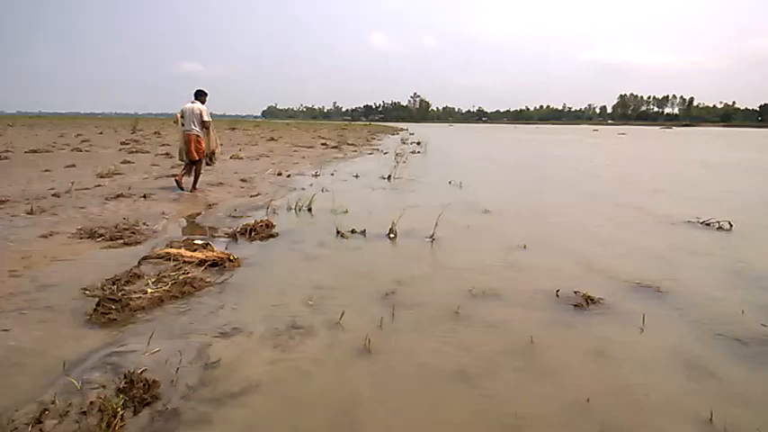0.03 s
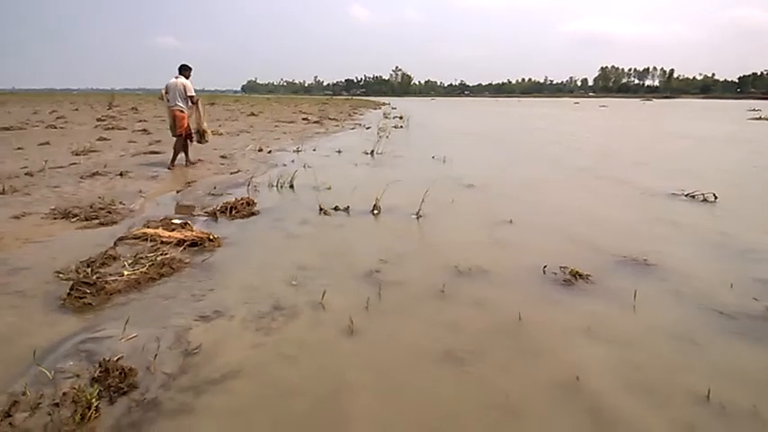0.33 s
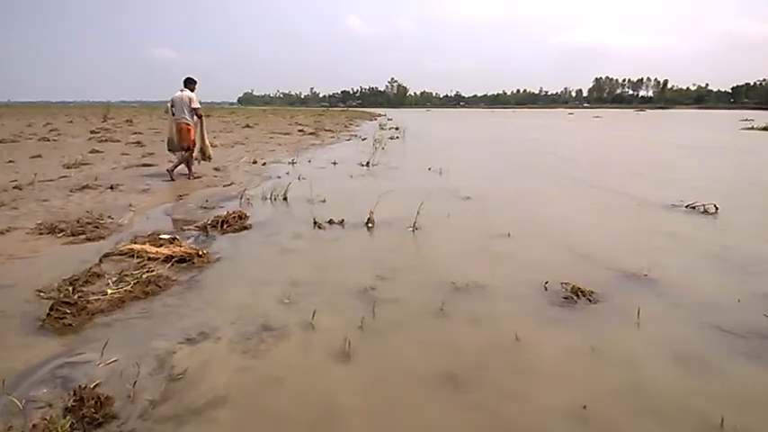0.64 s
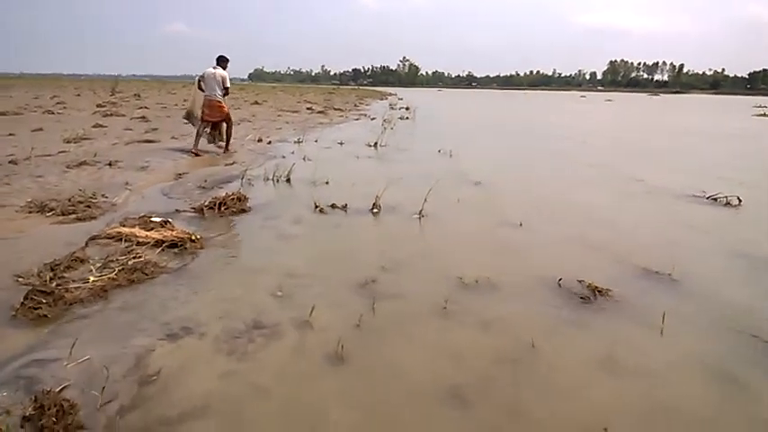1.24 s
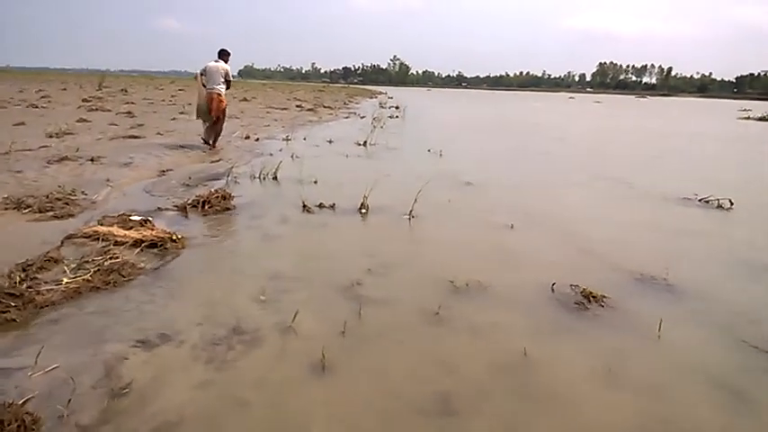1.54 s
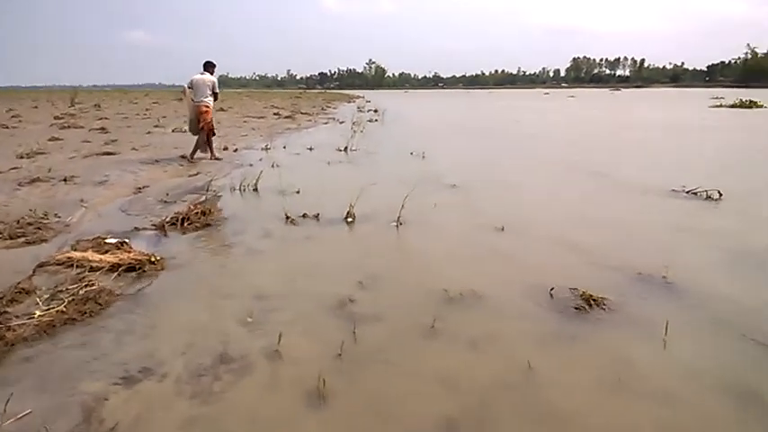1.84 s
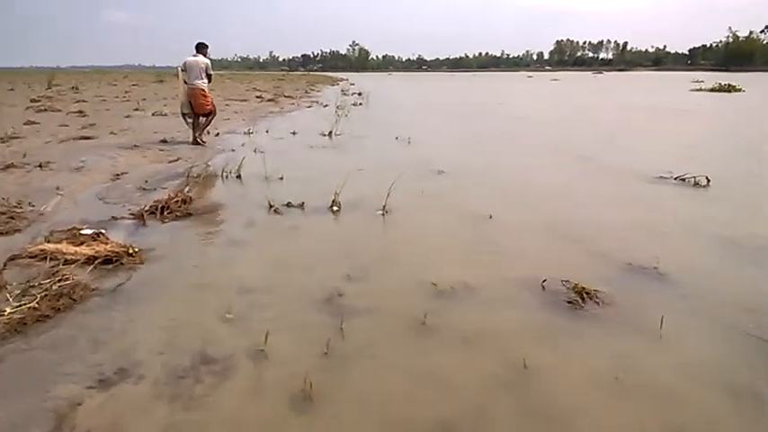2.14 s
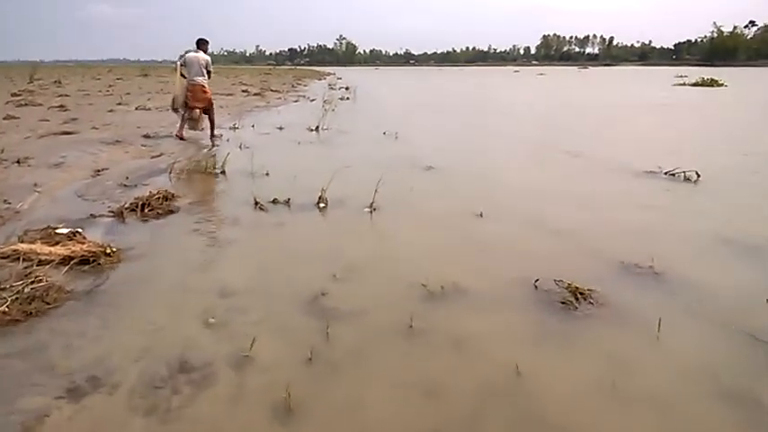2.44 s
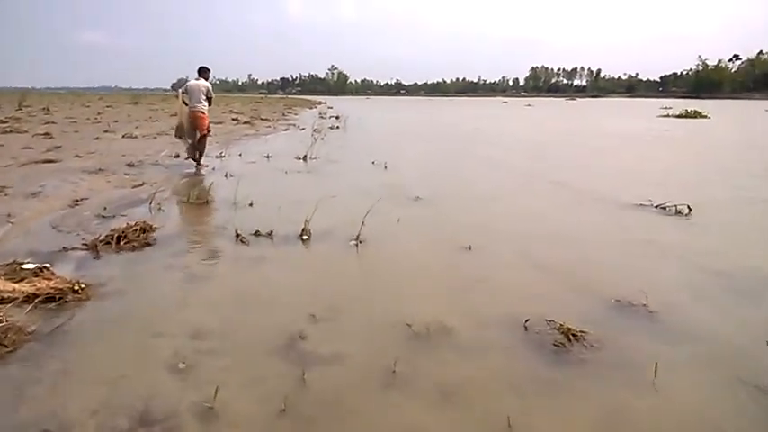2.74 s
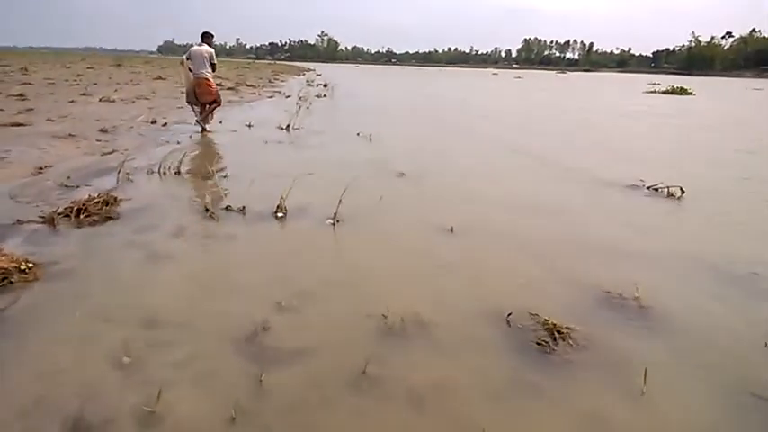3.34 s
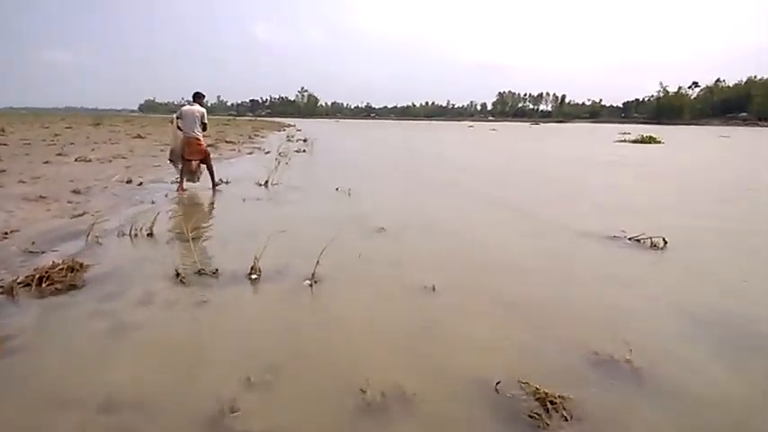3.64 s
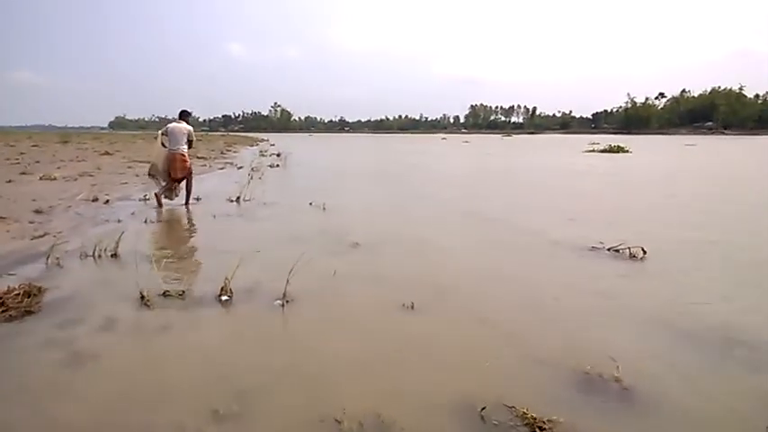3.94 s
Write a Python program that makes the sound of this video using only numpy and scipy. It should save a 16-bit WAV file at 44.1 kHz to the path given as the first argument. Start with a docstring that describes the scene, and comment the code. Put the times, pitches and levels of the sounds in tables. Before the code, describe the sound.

Soft wading footsteps slosh through shallow water and mud some metres away, about one a second, each gurgling and then dripping. Low wind buffets the microphone, strongest near the end, when a distant bird peeps faintly.

```python
"""Wading along a muddy river edge

A man wades some metres away, about one step a second. Each foot plunges in and drags air under,
which gurgles as resonating bubbles; the other pulls out with a snap of mud, throwing spray that
drips back. Wind eddies buffet the microphone, a far bird peeps, and a steady hiss lies under it all."""
import sys
import numpy as np
from scipy import signal
from scipy.fft import rfft, irfft
from scipy.io import wavfile
from scipy.ndimage import uniform_filter1d

SR = 44100
rng = np.random.default_rng(int(sys.argv[2]) if len(sys.argv) > 2 else 0)


def materialize(psi):
    """Save the field psi as 16-bit PCM at rate SR to the path in sys.argv[1].

    A 1-D psi becomes a single channel; in a 2-D psi each row is a channel.
    """
    bounded = np.clip(np.atleast_2d(psi).T, -1, 1)
    quanta = np.round(bounded * 32767).astype(np.int16)
    wavfile.write(sys.argv[1], SR, quanta)


N = 176400
TIME = np.arange(N) / SR


def from_db(db):
    """Amplitude ratio of a level in decibels."""
    return 10 ** (np.asarray(db) / 20)


def unit_rms(x):
    """Normalisation to unit mean power."""
    return x / np.sqrt(np.mean(x ** 2) + 1e-20)


def coloured(x, spectrum):
    """Spectral shaping by (f/Hz, level/dB) points, falling 12 dB an octave outside them; rms 1."""
    hz, db = np.transpose(spectrum)
    f = np.maximum(np.arange(N // 2 + 1) * SR / N, 1)
    skirts = np.minimum(f / hz[0], 1) ** 2 * np.minimum(hz[-1] / f, 1) ** 2
    gain = from_db(np.interp(np.log(f), np.log(hz), db))
    return unit_rms(irfft(rfft(x) * skirts * gain, N))


def noise(spectrum):
    """Filtered Gaussian noise of unit rms."""
    return coloured(rng.standard_normal(N), spectrum)


def evened(x, span_s):
    """Division by the running rms removes level swings slower than span_s."""
    size = max(int(span_s * SR), 2)
    power = uniform_filter1d(uniform_filter1d(x * x, size), size)
    return x / np.sqrt(np.abs(power) + 1e-9)


def add(out, start_s, sound):
    """Superposition of a sound from start_s on."""
    i = int(np.clip(start_s * SR, 0, N - 1))
    out[i:i + len(sound)] += sound[:N - i]


def swell(peak_s, rise_s, hold_s, decay_db_per_s):
    """Envelope with a Gaussian rise, a plateau and an exponential decay."""
    rise = np.exp(-2 * (np.minimum(TIME - peak_s, 0) / rise_s) ** 2)
    return rise * from_db(-decay_db_per_s * np.maximum(TIME - peak_s - hold_s, 0))


def bubble_cloud(spectrum, per_s, cycles, spread_db=6, pitches=28):
    """Bubbles as damped resonators, struck at random; each falls 60 dB in the given cycles."""
    born = rng.random(N) < per_s / SR
    strength = from_db(spread_db * np.minimum(rng.exponential(1, N), 4))
    impulses = born * strength * rng.choice([-1, 1], N)
    pitch_index = rng.integers(0, pitches, N)
    out = np.zeros(N)
    for k, hz in enumerate(np.geomspace(spectrum[0][0], spectrum[-1][0], pitches)):
        radius = np.exp(-np.log(1000) * hz / (cycles * SR))
        omega = 2 * np.pi * hz / SR
        feedback = [1, -2 * radius * np.cos(omega), radius * radius]
        drive = impulses * (pitch_index == k) + 1e-18
        out += omega * signal.lfilter([0, np.sin(omega)], feedback, drive)
    return coloured(out, spectrum)


# Spectrum of the hiss: f/Hz, level/dB
HISS_SPECTRUM = [(500, -4.5), (1400, -11.5), (2900, -14), (3950, -5.5), (5200, -16), (7500, -7.5),
                 (11000, -9.5), (15500, -14.5)]


def hiss(level_db=-59):
    """Stationary broadband noise forms a steady floor."""
    return from_db(level_db) * noise(HISS_SPECTRUM)


# Strength of the breeze: t/s, level/dB
BREEZE_LEVELS = [(.55, -53.5), (.8, -46), (.96, -60.5), (1.8, -40.5), (2.17, -55), (2.55, -45),
                 (2.87, -50.5), (3.4, -48), (4.0, -55.5)]
# Spectrum of the breeze: f/Hz, level/dB
BREEZE_SPECTRUM = [(20, 2), (95, 2), (150, -6), (350, -20.5), (550, -41.5)]
# Buffets: peak t/s, Gaussian half-width/s, peak rms level/dB, eddy f/Hz
WIND_BUFFETS = [(0.646, 0.002, -34.5, 177), (0.685, 0.051, -39, 85.6), (0.786, 0.012, -28.5, 103),
                (0.846, 0.025, -37.5, 97), (1.083, 0.068, -37.5, 112), (1.26, 0.0099, -24, 104),
                (1.289, 0.0089, -27, 118), (1.458, 0.002, -22.5, 208), (1.468, 0.029, -31, 85),
                (1.611, 0.0053, -19, 140), (1.666, 0.061, -30.5, 76.4), (1.769, 0.0098, -26.5, 114),
                (1.84, 0.081, -38, 86), (2.034, 0.047, -33, 75.6), (2.243, 0.0063, -29.5, 215),
                (2.263, 0.0071, -28, 58.5), (2.338, 0.016, -33.5, 59.7), (2.789, 0.0073, -16.5, 160),
                (2.94, 0.0088, -33.5, 84.5), (3.136, 0.017, -35.5, 138), (3.187, 0.0091, -22, 87),
                (3.247, 0.013, -19.5, 95), (3.317, 0.021, -29.5, 73.5), (3.479, 0.0081, -25.5, 108),
                (3.542, 0.018, -20, 126), (3.599, 0.012, -14.5, 216), (3.646, 0.032, -14.5, 117),
                (3.648, 0.029, -22, 196)]
# Spectrum of a buffet: multiple of the eddy frequency, level/dB
BUFFET_SPECTRUM = [(.2, -8), (1, 0.5), (1.6, -8), (2.5, -19), (4, -35), (8, -53)]


def wind(even_cycles=2.26):
    """Turbulent pressure at the microphone: a low breeze, and buffets that are higher for small eddies."""
    out = from_db(np.interp(TIME, *np.transpose(BREEZE_LEVELS))) * noise(BREEZE_SPECTRUM)
    for peak_s, width_s, db, hz in WIND_BUFFETS:
        spectrum = [(multiple * hz, band_db) for multiple, band_db in BUFFET_SPECTRUM]
        eddies = evened(noise(spectrum), span_s=even_cycles / hz)
        envelope = np.exp(-np.minimum(((TIME - peak_s) / width_s) ** 2, 100) / 2)
        out += from_db(db) * envelope * eddies
    return out


# A foot enters the water: peak t/s, level/dB, decay/(dB/s), rise/s
FOOT_PLUNGES = [(0.234, -51.5, 159, 0.032), (1.101, -42.5, 86, 0.04), (2.028, -45.5, 102, 0.037),
                (2.295, -42.5, 66, 0.018), (3.023, -43.5, 93, 0.018), (3.951, -49, 91, 0.066)]
# Spectrum of the gurgle: f/Hz, level/dB
PLUNGE_SPECTRUM = [(450, -9), (650, -3), (900, 1), (1150, 1), (1500, -5.5), (2200, -13.5), (4500, -25)]


def plunges():
    """Air entrainment: each foot drags under bubbles that ring low over a soft wash."""
    envelope = sum(from_db(db) * swell(peak_s, rise_s, 0, decay)
                   for peak_s, db, decay, rise_s in FOOT_PLUNGES)
    bubbles = bubble_cloud(PLUNGE_SPECTRUM, per_s=750, cycles=30)
    wash = 0.4 * noise(PLUNGE_SPECTRUM)
    return envelope * evened(bubbles + wash, span_s=0.033)


# Mud and water films snap: peak t/s, peak rms level/dB
MUD_SNAPS = [(.307, -45), (0.591, -54), (2.782, -48.5), (3.289, -60), (3.385, -53)]
# Spectrum of a snap: f/Hz, level/dB
SNAP_SPECTRUM = [(4200, 1), (12000, -5)]


def snaps():
    """Rupture of wet mud and water films: brief transients, bright and without pitch."""
    envelope = sum(from_db(db) * swell(peak_s, rise_s=0.0054, hold_s=0, decay_db_per_s=1202)
                   for peak_s, db in MUD_SNAPS)
    return envelope * noise(SNAP_SPECTRUM)


# Single plops and drips: t/s, relative level/dB, starting f/Hz, cycles to fall 60 dB
SINGLE_BUBBLES = [(0.366, -58, 785, 104), (.446, -38.5, 2370, 12), (.571, -37, 3960, 32),
                  (.673, -43.5, 2500, 46), (.683, -32.5, 3570, 16.5), (0.737, -42, 847, 19.6),
                  (.749, -36, 4040, 15), (.796, -40.5, 4800, 19), (1.087, -26, 854, 16),
                  (1.121, -24.5, 860, 13.4), (1.201, -34, 3600, 12), (1.359, -20, 3400, 7.2),
                  (1.384, -41.5, 1080, 40), (1.629, -23.5, 2160, 10.7), (1.672, -19.5, 3420, 6.4),
                  (1.673, -29.5, 1690, 9.7), (1.77, -37, 5000, 12), (2.022, -23, 985, 14),
                  (2.072, -32, 1026, 29), (2.325, -28, 3470, 22), (2.389, -29, 3900, 24),
                  (2.394, -17, 3530, 5.8), (2.466, -25.5, 3460, 17), (2.547, -31.5, 3860, 25),
                  (2.588, -31.5, 3700, 24), (2.628, -33.5, 2190, 28), (2.703, -38, 1183, 81),
                  (2.758, -22, 1636, 16), (2.764, -21, 2090, 15.3), (3.024, -33.5, 980, 27),
                  (3.074, -32, 750, 8.6), (3.252, -23, 2470, 11), (3.372, -18.5, 3750, 6.3),
                  (3.5743, -27.5, 3370, 19), (3.588, -31.5, 4360, 23), (3.889, -25.5, 1480, 7.6),
                  (3.901, -31, 1050, 17), (3.92, -26.5, 1570, 14), (3.954, -37, 895, 25)]


def plops(gain_db=3, glide_per_s=17, onset_cycles=0.94, spatter_db=-3, spatter_t60_s=0.063):
    """Bubble resonance: a damped tone rises in pitch, trailed by a spatter of smaller drops."""
    out, t = np.zeros(N), TIME[:SR // 10]
    for start_s, db, hz, cycles in SINGLE_BUBBLES:
        phase = 2 * np.pi * np.cumsum(hz * (1 + glide_per_s * t)) / SR
        onset = 1 - np.exp(-(t * hz / onset_cycles) ** 2)
        ring = np.sin(phase) * onset * np.exp(-np.log(1000) * t * hz / cycles)
        scatter = rng.standard_normal(len(t)) * np.exp(-np.log(1000) * t / spatter_t60_s)
        trail = signal.fftconvolve(ring, scatter)[:len(t)]
        spatter = from_db(spatter_db) * ring.std() * unit_rms(trail)
        add(out, start_s, from_db(db + gain_db) * (ring + spatter))
    return out


# The lifted foot throws spray: peak t/s, rise/s, hold/s, level/dB, decay/(dB/s), mist re drops/dB
FOOT_SPRAYS = [(0.601, 0.012, 0.012, -62.5, 96, -6.5), (1.365, 0.017, 0.034, -46.5, 93, -16),
               (2.284, 0.067, 0.105, -47.5, 109, -25), (2.65, 0.18, 0.13, -55, 76, -20),
               (3.256, 0.067, 0.042, -44.5, 167, -9.5), (3.365, 0.011, 0.0094, -46, 258, -9.5),
               (3.529, 0.098, 0.011, -48, 312, -53)]
# Spectrum of the drops: f/Hz, level/dB
DROP_SPECTRUM = [(700, -40), (1300, 1.5), (1750, 4), (2350, 5.5), (2950, 1), (3500, 8), (4200, 6.5),
                 (5100, -9), (7000, -8.5)]
# Spectrum of the fine mist: f/Hz, level/dB
MIST_SPECTRUM = [(4000, -4), (5500, 4), (7500, -7), (15000, -28)]


def sprays(drops_per_s=1900, cycles=32):
    """Drop impact: spray and finer mist ring as clouds of tiny bubbles; stray drips fall throughout."""
    bubbles = bubble_cloud(DROP_SPECTRUM, drops_per_s, cycles)
    wash = 0.62 * noise(DROP_SPECTRUM)
    drops = evened(bubbles + wash, span_s=0.03)
    mist = evened(bubble_cloud(MIST_SPECTRUM, drops_per_s, cycles), span_s=0.038)
    thrown = sum(from_db(db) * swell(peak_s, rise_s, hold_s, decay) * (drops + from_db(mist_db) * mist)
                 for peak_s, rise_s, hold_s, db, decay, mist_db in FOOT_SPRAYS)
    stray_drips = from_db(-67.5) * bubble_cloud(DROP_SPECTRUM, per_s=160, cycles=66, spread_db=-2)
    return thrown + stray_drips


# Calls of a far bird: t/s, duration/s, centre f/Hz, peak level/dB
BIRD_PEEPS = [(3.588, 0.044, 3630, -47), (3.736, 0.041, 4010, -53), (3.785, 0.03, 3220, -52),
              (3.814, 0.022, 3190, -49.5), (3.832, 0.06, 3290, -48.5)]


def bird(sag_hz_per_s=950, waver_hz=45):
    """Frequency modulation: each thin peep is a pure tone that wavers and sags a little."""
    out = np.zeros(N)
    waver = waver_hz * noise([(20, -8), (150, -6)])
    for start_s, length_s, hz, db in BIRD_PEEPS:
        t = TIME[:int(length_s * SR)]
        pitch = hz - sag_hz_per_s * (t - length_s / 2) + np.roll(waver, -int(start_s * SR))[:len(t)]
        envelope = from_db(db) * np.sin(np.pi * t / length_s)
        add(out, start_s, envelope * np.sin(2 * np.pi * np.cumsum(pitch) / SR))
    return out


def scene():
    """Superposition of water, mud, wind, bird and hiss at one microphone."""
    wading = plunges() + sprays() + plops() + snaps()
    return (wading + wind() + bird() + hiss())[None]


def record(dry):
    """Band limiting: the sound fades in from silence and a steep low-pass cuts the highest treble."""
    fade_start_s, fade_end_s, cutoff_hz = 0.15, 0.36, 15700
    fade_in = np.interp(TIME, [fade_start_s, fade_end_s], [0, 1]) ** 2
    low_pass = signal.ellip(12, .1, 90, cutoff_hz, fs=SR, output="sos")
    return signal.sosfilt(low_pass, dry * fade_in)


dry = scene()
out = record(dry)
materialize(out)
```